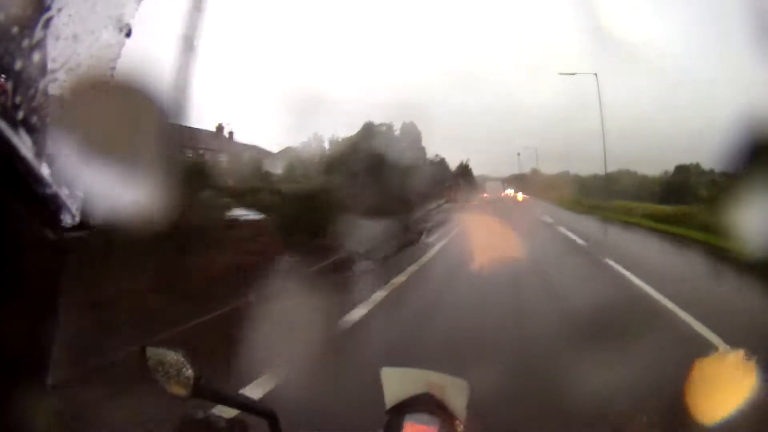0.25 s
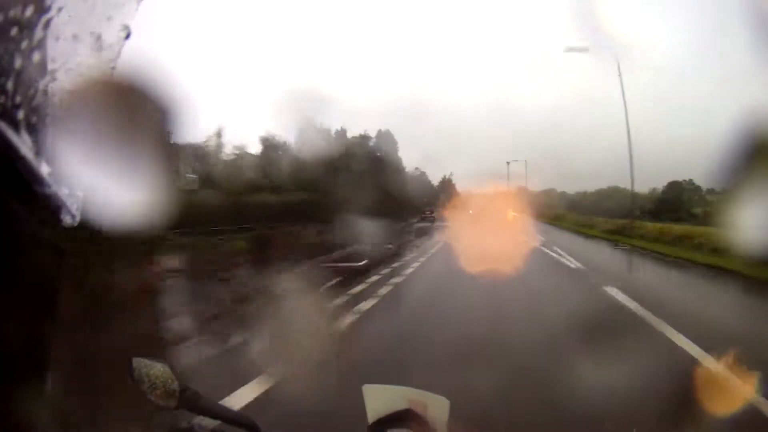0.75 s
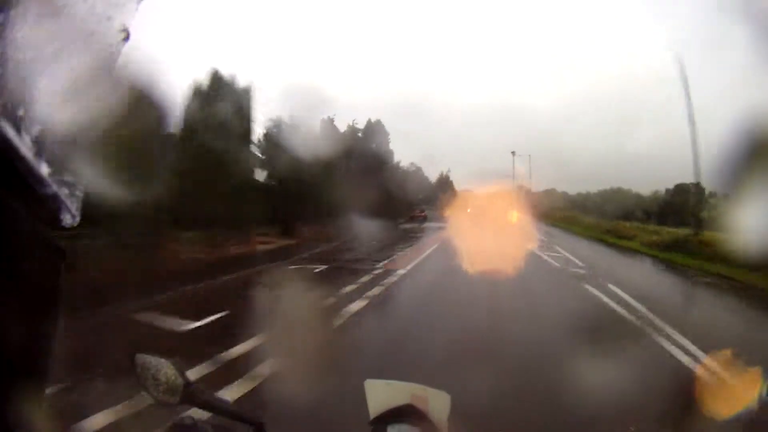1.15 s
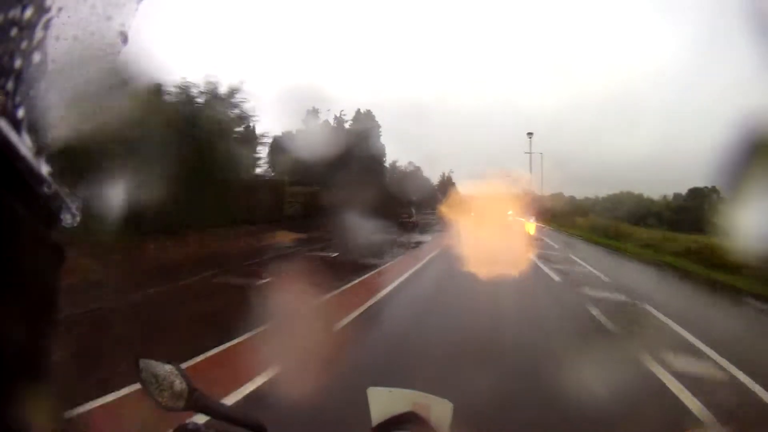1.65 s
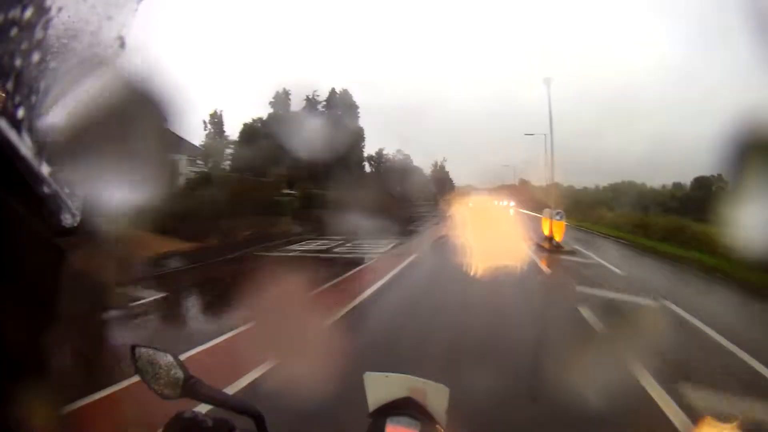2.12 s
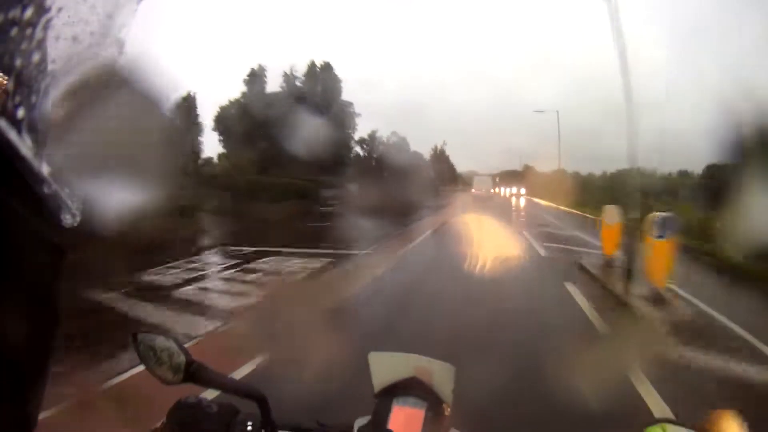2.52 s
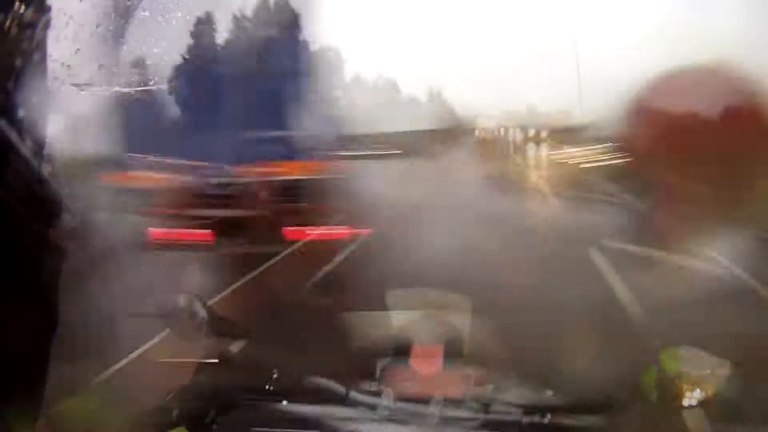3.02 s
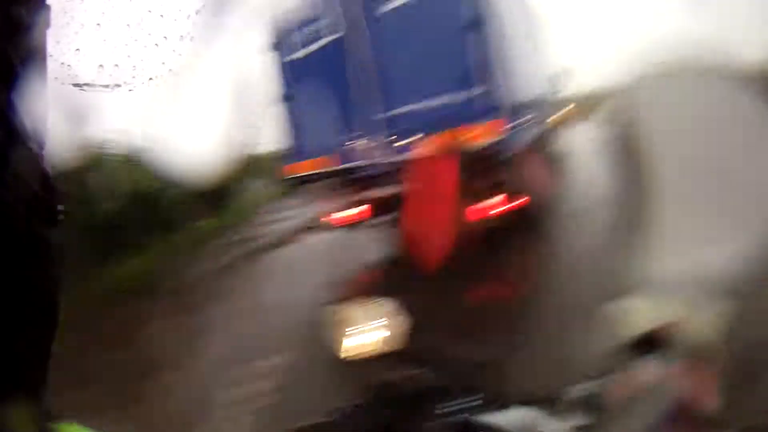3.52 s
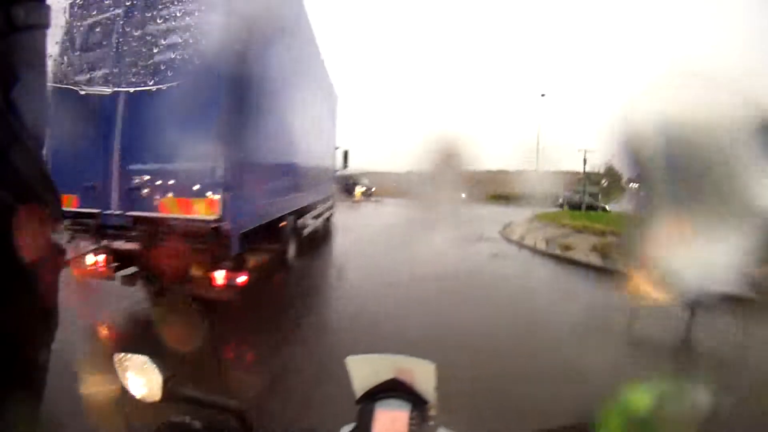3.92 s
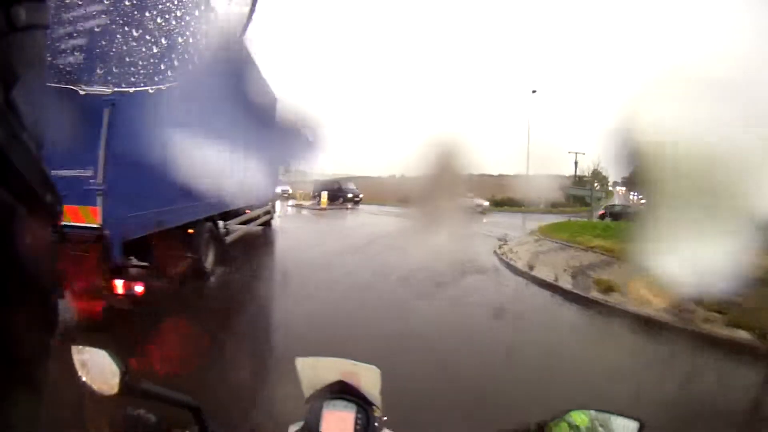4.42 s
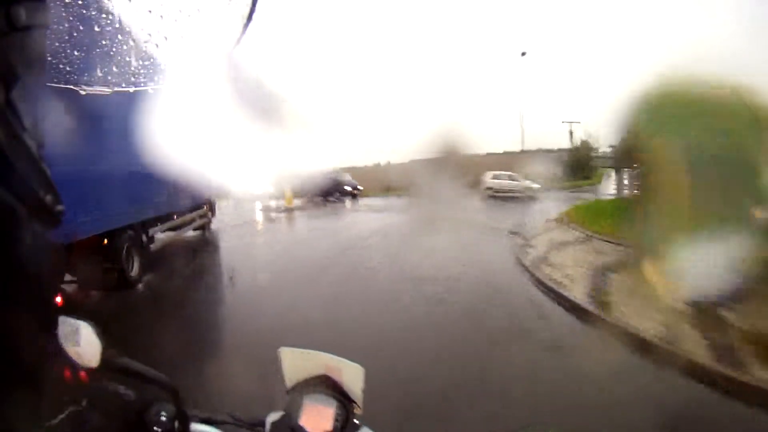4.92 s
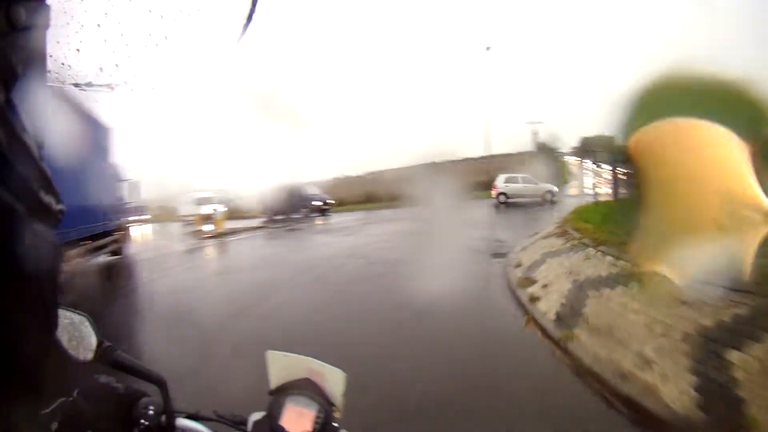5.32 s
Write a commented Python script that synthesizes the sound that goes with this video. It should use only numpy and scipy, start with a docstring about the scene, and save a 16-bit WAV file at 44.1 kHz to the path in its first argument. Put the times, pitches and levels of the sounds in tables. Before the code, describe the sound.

A steady single-cylinder motorcycle growls through buffeting wind on a wet road, then a lorry's deep diesel drone rises close alongside.

```python
"""Motorcycle and lorry on a wet road

One microphone at the rider's helmet, in the wind. A single-cylinder motorcycle, a stack of engine orders, opens up
and rolls off again. Filtered noise gives the wind, the hiss of wet tyres and two puddles; filtered taps are raindrops
on the housing. Close alongside comes a diesel lorry: a sine drone climbs through resonances, under roar and spray."""
import sys
import numpy as np
from scipy import signal
from scipy.fft import rfft, irfft, next_fast_len
from scipy.io import wavfile
from scipy.ndimage import uniform_filter1d, map_coordinates

SR = 44100
rng = np.random.default_rng(int(sys.argv[2]) if len(sys.argv) > 2 else 0)


def output_pcm(signal):
    """Save a mono or channel-first signal as 16-bit PCM at the path in sys.argv[1].

    Samples are clipped to [-1, 1] before scaling.
    """
    pcm = np.clip(np.atleast_2d(signal).T, -1, 1) * 32767
    wavfile.write(sys.argv[1], SR, np.round(pcm).astype(np.int16))


N = 245275

# Motorcycle engine speed: time_s, firing_hz [s, Hz]
BIKE_FIRING = [(0, 41.72), (2.9, 41.62), (3.07, 41.25), (3.17, 43.55), (3.27, 45.2), (3.45, 47.25),
               (3.63, 47.75), (3.81, 47.25), (4, 44.25), (4.23, 40.45), (4.44, 37.5), (4.54, 35.2),
               (5.2, 36), (5.56, 35.9)]
# Motorcycle effort: time_s, exhaust_db, upper_order_brightness_db [s, dB, dB]
BIKE_EFFORT = [(0, -40, -20), (2.4, -41.5, -17), (3.1, -43.5, -9), (3.25, -42, 1), (3.85, -40, 2),
               (4.1, -42, -3.5), (4.42, -45, -4.5), (4.56, -52, -15), (5.15, -48.5, -2), (5.56, -49, -8)]
# Silencer and airbox, gain on an engine order: pitch_hz, gain_db [Hz, dB]
SILENCER_GAIN = [(42, 1.5), (92, -9), (135, -10.5), (178, 1), (210, -5.5), (240, -5), (285, -9.5),
                 (332, -6.5), (378, -12.5), (440, -7.5), (520, -10), (570, -22.5), (618, -16), (665, -17.5),
                 (730, -26.5), (1100, -39.5)]
# Shape of the turbulence in the exhaust: pitch_hz, density_db [Hz, dB per Hz]
EXHAUST_GAS_SHAPE = [(70, -20), (150, -1), (220, 0.5), (340, -2.5), (520, -5.5), (700, -9), (1200, -30.5),
                     (5000, -89.5)]
# Motorcycle gear tones: firing_multiple, level_db [ratio, dB]
GEAR_TONES = [(10.98, -52.7), (13.43, -58), (14.97, -67)]
# Response of a bodywork panel shaken by the engine: pitch_hz, gain_db [Hz, dB]
PANEL_SHAPE = [(200, -65.5), (390, -8), (440, -3), (490, -12), (560, -13), (612, 1.5), (660, -1),
               (720, -23), (1000, -38), (5000, -120)]
# Spells of louder panel buzz: start_s, end_s, level_db [s, s, dB]
PANEL_BUZZES = [(3.173, 3.26, -52), (3.925, 4, -59), (4.944, 5.56, -58.5)]
# Pace of the ride, which slackens behind the lorry: time_s, level_db [s, dB over cruising]
RIDE_PACE = [(0, -0.5), (1.7, -1.4), (2.5, -2.5), (2.88, -5.5), (3.08, -8), (4.3, -8.5), (5.56, -5.5)]
# Strength of the eddies at the microphone: time_s, level_db [s, dB over cruising]
EDDY_STRENGTH = [(0, 2.5), (1.3, -3.3), (2.5, 0), (2.8, -8), (3.3, -9.5), (4.4, -8.5), (4.9, -3.5),
                 (5.56, -5.5)]
# Gusts round the helmet: peak_s, length_s, extra_buffet_db, extra_air_db [s, s, dB, dB]
HELMET_GUSTS = [(0.237, 0.094, 6, 6), (0.49, 0.035, 5.5, 4), (0.74, 0.049, 3, -0.5), (1.02, 0.046, 7.5, 1),
                (1.086, 0.036, 5, 1.5), (1.337, 0.094, 1, 4), (1.676, 0.28, 3, 5.5), (1.908, 0.1, 6.5, 2),
                (2.344, 0.049, 3, 2.5), (2.583, 0.052, 3.5, 4.5), (3.035, 0.1, 7, 7.5),
                (5.321, 0.1, 4.5, 1)]
# Shape of the eddies thumping on the microphone: pitch_hz, density_db [Hz, dB per Hz]
BUFFET_SHAPE = [(8, 1.5), (18, 3.5), (30, -8.5), (40, 1), (55, -6), (75, -6), (110, -13.5), (200, -49.5),
                (1200, -120)]
# Shape of the air rushing round the helmet: pitch_hz, density_db [Hz, dB per Hz]
AIR_SHAPE = [(30, -17.5), (70, -1), (115, -0.5), (170, 0), (250, -9), (330, -7.5), (450, -16.5), (700, -23),
             (1500, -40), (8000, -120)]
# Shape of the whistle at an edge: pitch_hz, density_db [Hz, dB per Hz]
WHISTLE_SHAPE = [(5500, -68.5), (6800, -17.0), (7130, 4.5), (7450, -17.0), (9000, -72.5)]
# Shape of the tread roar: pitch_hz, density_db [Hz, dB per Hz]
TREAD_SHAPE = [(100, -8), (300, -0.5), (550, -4.5), (800, -3), (1050, -7), (1400, -12.5), (1800, -19.5),
               (2250, -19), (2900, -22.5), (4000, -29.5), (9000, -70.5)]
# Shape of the fizzing water film: pitch_hz, density_db [Hz, dB per Hz]
FILM_SHAPE = [(1000, -13), (2500, 0), (3250, 1), (3600, -.5), (3900, 2.5), (4300, 0.5), (5000, -0.5),
              (5500, -1), (6000, -2), (6500, -3.5), (7200, -4.5), (7900, -6), (9500, -11.5), (11000, -18.5),
              (15500, -19.5)]
# Shape of the puddle spray: pitch_hz, density_db [Hz, dB per Hz]
PUDDLE_SHAPE = [(500, -23), (1500, 13.5), (2000, 4.5), (2700, 4.5), (4900, -5), (5300, 3), (5700, 4),
                (6200, -6), (7600, -5), (8700, -16), (10700, -15.5), (12000, -25), (16000, -33)]
# Standing water under the tyres: start_s, end_s, level_db [s, s, dB]
PUDDLE_TIMES = [(0.44, 0.674, -59), (3.62, 3.68, -71.5)]
# Shape of the thin spit of spray: pitch_hz, gain_db [Hz, dB]
SPIT_SHAPE = [(6000, -50), (8000, -14), (8800, 0), (10300, -4), (11200, -16), (16000, -32)]
# Raindrops on the housing: start_s, peak_db, centre_hz, half_width_octaves, t60_s [s, dB, Hz, octaves, s]
RAINDROPS = [(1.4295, -35, 1600, 1.15, .004), (1.948, -52.5, 6600, .3, .02), (2.0191, -41.5, 3850, .4, .02),
             (2.0215, -47, 2950, .18, .02), (2.53, -50, 2200, .25, .05), (2.768, -53, 4100, .3, .04)]
# Lorry engine speed: time_s, firing_hz [s, Hz]
LORRY_FIRING = [(3.05, 56.8), (3.45, 58.2), (3.65, 61.4), (3.83, 62.6), (4, 66.2), (4.17, 67.3),
                (4.82, 78.9), (5.35, 89), (5.56, 94.8)]
# Exhaust overtone and gear whine: firing_multiple, level_db, centre_hz, width_hz [ratio, dB, Hz, Hz]
LORRY_OVERTONES = [(2, -46, 157, 20), (6.88, -48.5, 632, 75)]
# Nearness of the lorry: time_s, level_db [s, dB under its closest]
LORRY_NEARNESS = [(0, -45.5), (2.8, -13), (3.3, -9.5), (3.62, -2), (3.98, -2), (4.3, -1), (4.9, -.5),
                  (5.56, -0.5)]
# Shape of the diesel roar: pitch_hz, density_db [Hz, dB per Hz]
DIESEL_SHAPE = [(100, -12.5), (300, -13), (450, -2.5), (600, -0.5), (780, -6), (1000, -4.5), (1170, -10.5),
                (1350, -10.5), (1850, -21.5), (2350, -18.5), (2900, -22), (3400, -30.5), (6000, -48),
                (12000, -65.5)]
# Shape of the lorry's wheel spray: pitch_hz, density_db [Hz, dB per Hz]
LORRY_SPRAY_SHAPE = [(2000, -15.5), (4200, -1.0), (5500, -2.0), (7000, -0.5), (8500, -5.5),
                     (11000, -12.5), (15500, -19.5)]

SMEAR_S_PER_HZ = 1.1e-5  # how much later each higher frequency leaves the silencer
GAS_DB = -9  # against the exhaust note
BUZZ_REST_DB, BUZZ_SWELL_S = -60.5, 0.043  # steady panel buzz; time to swell and to die
GEARS_GONE_S, GEAR_FADE_S = 3.57, 0.94
BUFFET_DB, AIR_DB, WHISTLE_DB = -29.5, -37.5, -82  # wind at cruising pace
TREAD_DB, FILM_DB = -48.5, -67.5  # tyres at cruising pace; the film lies under the tread
TYRE_GROWTH = 0.61  # tyre dB per dB of pace
PUDDLE_ATTACK_S, PUDDLE_RELEASE_S = 0.25, 0.06
SPIT_S, SPIT_LENGTH_S, SPIT_DB = 1.103, 0.092, -78
SPLASH_DB = -21  # noise of a raindrop's splash against its tap, before the band filter
ALONGSIDE_S, DRAW_UP_S = 3.43, 0.66  # the drone is full at the first, after rising for the second
DRONE_DB, BOOM_HZ, BOOM_WIDTH_HZ = -27, 71.7, 18.8
OVERTONE_RADIANS, OVERTONE_WAVER_DB, OVERTONE_RATE_HZ = 1.0, 3.2, 12
ROAR_DB, LORRY_SPRAY_DB = -43.5, -75  # close to the lorry
TOP_HZ = 15700


def amp(db):
    """Decibels to gain."""
    return 10 ** (np.asarray(db) / 20)


def unit(x):
    """Scaled to rms 1."""
    return x / np.sqrt(np.mean(x ** 2) + 1e-20)


def curves(rows):
    """One value per sample for each column after the time."""
    s, *cols = np.transpose(rows)
    return [np.interp(np.arange(N) / SR, s, c) for c in cols]


def wobble(rate):
    """A smooth random curve, rate knots a second."""
    knots = rng.standard_normal(int(N * rate / SR) + 4)
    return map_coordinates(knots, [np.arange(N) * rate / SR])


def coloured(x, points):
    """x through a causal minimum-phase filter with the given (Hz, dB) shape, at rms 1."""
    size = 2 * next_fast_len(N // 2 + SR // 4)
    hz, db = np.transpose(points)
    shape_db = np.interp(np.log(np.fft.rfftfreq(size, 1 / SR) + 1), np.log(hz), db)
    # folding the cepstrum forward makes the filter causal
    cepstrum = irfft(np.log(amp(shape_db)))
    cepstrum[1:size // 2] *= 2
    cepstrum[size // 2 + 1:] = 0
    response = np.exp(rfft(cepstrum))
    return unit(irfft(rfft(x, size) * response)[:N])


def rush(points, patchy_db):
    """Turbulent noise of rms 1, with patches of random gain in time and frequency."""
    z = signal.stft(rng.standard_normal(N), nperseg=512)[2]
    field = uniform_filter1d(rng.standard_normal(z.shape), size=6, axis=0)
    field = uniform_filter1d(field, size=12, axis=1)
    patchy = signal.istft(z * amp(patchy_db * unit(field)), nperseg=512)[1][:N]
    return coloured(patchy, points)


def rise(full_s, length_s):
    """0 until it climbs to 1 over length_s, arriving at full_s."""
    return np.clip(1 + (np.arange(N) / SR - full_s) / length_s, 0, 1)


def held(from_s, to_s, attack_s, release_s):
    """Attack before from_s, hold at 1 between the two times, release after to_s."""
    return rise(from_s, attack_s) * (1 - rise(to_s + release_s, release_s))


def resonance(hz, centre_hz, width_hz):
    """Gain of a single resonance, 1 at its centre."""
    return 1 / np.hypot(1, 2 * (hz - centre_hz) / width_hz)


def swell(s, length_s):
    """A smooth bump that peaks at 1 at time s."""
    return np.exp(-(2 * (np.arange(N) / SR - s) / length_s) ** 2)


def motorcycle():
    """Firings sound as engine orders through the silencer; throttle brightens them, and load shakes a panel."""
    firing_hz, = curves(BIKE_FIRING)
    exhaust_db, bright_db = curves(BIKE_EFFORT)
    buzz = amp(BUZZ_REST_DB)
    for start_s, end_s, level_db in PANEL_BUZZES:
        buzz = buzz + amp(level_db) * held(start_s, end_s, BUZZ_SWELL_S, BUZZ_SWELL_S)
    turns = np.cumsum(firing_hz) / SR

    # no two firings are quite alike in strength or moment
    crank = turns + 0.0012 * wobble(40)
    strength_db = exhaust_db + 0.5 * wobble(40)
    orders = np.zeros(N)
    for order in range(1, 25):
        hz = order * firing_hz
        upper = np.clip((hz - 275) / 190, 0, 1)
        pipe = amp(strength_db + np.interp(hz, *np.transpose(SILENCER_GAIN)) + upper * bright_db)
        panel = buzz * amp(np.interp(hz, *np.transpose(PANEL_SHAPE)) - 4.5)
        # the silencer holds back the higher orders, and paths round the bike shift each one:
        # the thumps blur into a growl
        shift = -np.pi * SMEAR_S_PER_HZ * hz ** 2 + 0.7 * rng.standard_normal()
        waver = amp(0.7 * upper * wobble(5))
        tone = np.sqrt(2) * np.sin(2 * np.pi * order * crank + shift)
        orders += waver * np.hypot(pipe, panel) * tone

    # the panel's rattle swells and ebbs with each firing
    throb = 1 + 0.4 * np.sin(2 * np.pi * turns)
    rattle = amp(-1.5) * buzz * coloured(rng.standard_normal(N) * throb, PANEL_SHAPE)
    # with the throttle open, rushing gas fills the gaps between the thumps
    gas_db = exhaust_db + np.minimum(bright_db, 0) + GAS_DB
    gas = amp(gas_db) * rush(EXHAUST_GAS_SHAPE, patchy_db=1.0)
    # the gears sing while the bike cruises, then fade away
    gears = np.zeros(N)
    for multiple, level_db in GEAR_TONES:
        tone = unit(np.sin(2 * np.pi * multiple * turns + 0.5 * wobble(2.5)))
        gears += amp(level_db + 0.8 * wobble(4)) * tone
    return orders + gas + rattle + (1 - rise(GEARS_GONE_S, GEAR_FADE_S)) * gears


def wind():
    """Eddies thump on the microphone; air rushes round the helmet and whistles faintly at an edge with pace."""
    pace_db, = curves(RIDE_PACE)
    eddy_db, = curves(EDDY_STRENGTH)
    buffet_db = BUFFET_DB + eddy_db
    air_db = AIR_DB + pace_db
    for peak_s, length_s, extra_buffet_db, extra_air_db in HELMET_GUSTS:
        gust = swell(peak_s, length_s)
        buffet_db = buffet_db + extra_buffet_db * gust
        air_db = air_db + extra_air_db * gust
    flutter = wobble(21.7)  # shared by buffet and air
    buffet = amp(buffet_db + 0.49 * flutter) * rush(BUFFET_SHAPE, patchy_db=-1.0)
    air = amp(air_db + 0.9 * flutter) * rush(AIR_SHAPE, patchy_db=1.5)
    whistle = amp(WHISTLE_DB + 1.3 * pace_db) * rush(WHISTLE_SHAPE, patchy_db=1)
    return buffet + air + whistle


def tyres():
    """Tread roar and water-film fizz grow with pace; puddles throw up bursts of spray and a thin spit."""
    pace_db, = curves(RIDE_PACE)
    tread = amp(TREAD_DB + 0.24 * wobble(11)) * rush(TREAD_SHAPE, patchy_db=0.0)
    # about 300 droplets a second crackle in the film
    droplets = (rng.random(N) < 300 / SR) * rng.standard_normal(N)
    film = rush(FILM_SHAPE, patchy_db=1.2) + 0.26 * coloured(droplets, FILM_SHAPE)
    rolling = amp(TYRE_GROWTH * pace_db) * (tread + amp(FILM_DB) * film)

    ploughing = sum(amp(level_db) * held(start_s, end_s, PUDDLE_ATTACK_S, PUDDLE_RELEASE_S)
                    for start_s, end_s, level_db in PUDDLE_TIMES)
    puddles = ploughing * coloured(rng.standard_normal(N), PUDDLE_SHAPE)
    # the spit follows the first puddle
    spit = swell(SPIT_S, SPIT_LENGTH_S) * coloured(rng.standard_normal(N), SPIT_SHAPE)
    return rolling + puddles + amp(SPIT_DB) * spit


def raindrops():
    """Each drop is one sharp tap and a faint short splash, in its own band."""
    out = np.zeros(N + SR)
    t = np.arange(SR // 4) / SR
    for start_s, peak_db, centre_hz, half_width, t60_s in RAINDROPS:
        edges = np.clip([centre_hz / 2 ** half_width, centre_hz * 2 ** half_width], 1, SR / 2 - 1)
        band = signal.butter(N=3, Wn=edges, btype="band", fs=SR, output="sos")
        tap = t == 0
        splash = rng.standard_normal(len(t)) * amp(SPLASH_DB - 60 * t / t60_s)
        tick = signal.sosfilt(band, tap + splash)
        out[round(start_s * SR):][:len(t)] += amp(peak_db) * tick / np.abs(tick).max()
    return out[:N]


def lorry():
    """A nearly pure exhaust drone climbs through resonances, under wheel spray and a throbbing diesel roar."""
    firing_hz, = curves(LORRY_FIRING)
    near_db, = curves(LORRY_NEARNESS)
    turns = np.cumsum(firing_hz) / SR
    drone = amp(DRONE_DB + 0.21 * wobble(8.9)) * unit(np.sin(2 * np.pi * turns))
    boom = resonance(firing_hz, BOOM_HZ, BOOM_WIDTH_HZ) * drone

    overtones = np.zeros(N)
    for multiple, level_db, centre_hz, width_hz in LORRY_OVERTONES:
        level = amp(level_db + OVERTONE_WAVER_DB * wobble(OVERTONE_RATE_HZ))
        phase = 2 * np.pi * multiple * turns + OVERTONE_RADIANS * wobble(OVERTONE_RATE_HZ)
        overtones += level * resonance(multiple * firing_hz, centre_hz, width_hz) * unit(np.sin(phase))

    throb = unit(1 + 0.1 * np.cos(2 * np.pi * turns))
    roar = amp(ROAR_DB + 0.24 * wobble(17)) * throb * rush(DIESEL_SHAPE, patchy_db=0.5)
    spray = amp(LORRY_SPRAY_DB) * rush(LORRY_SPRAY_SHAPE, patchy_db=2.5)
    return rise(ALONGSIDE_S, DRAW_UP_S) * boom + amp(near_db) * (overtones + roar + spray)


def scene():
    """Everything meets at one microphone."""
    return (motorcycle() + wind() + tyres() + raindrops() + lorry())[None]


def record(dry):
    """A steep low-pass sets the top of the band; the sound closes with a fade of 128 samples."""
    closing = np.minimum(np.arange(N)[::-1] / 128, 1)
    band_limit = signal.ellip(N=10, rp=0.1, rs=80, Wn=TOP_HZ, fs=SR, output="sos")
    return closing * signal.sosfilt(band_limit, dry)


dry = scene()
out = record(dry)
output_pcm(out)
```